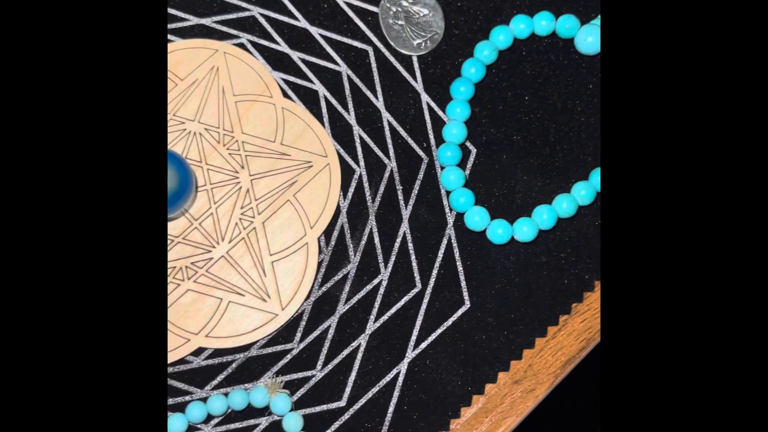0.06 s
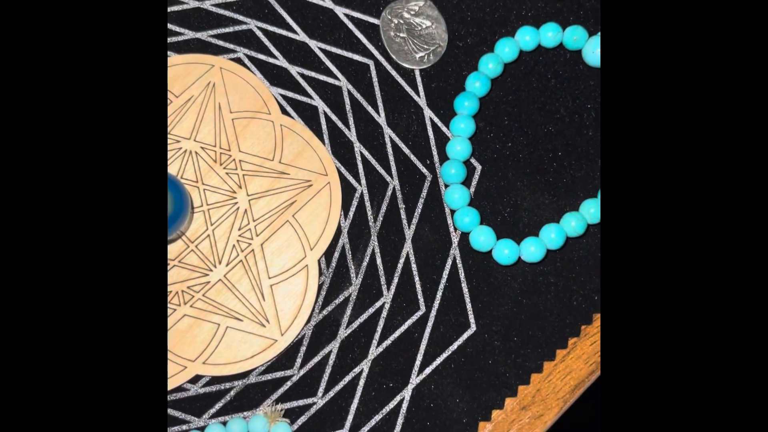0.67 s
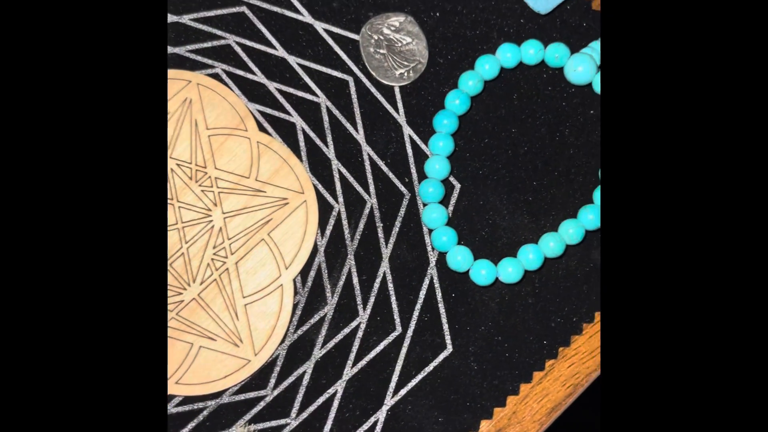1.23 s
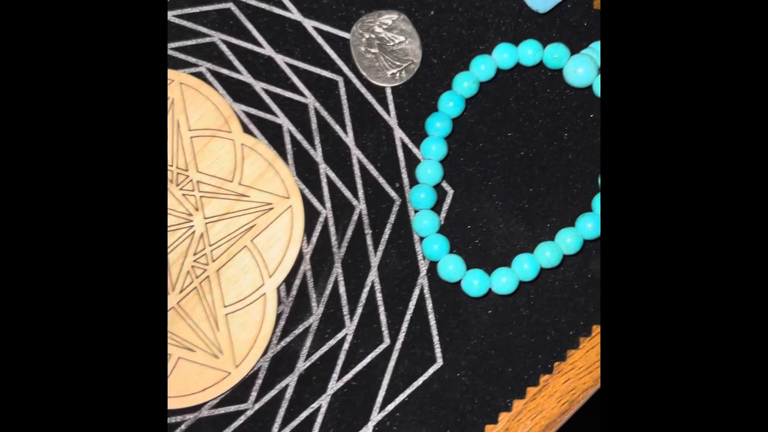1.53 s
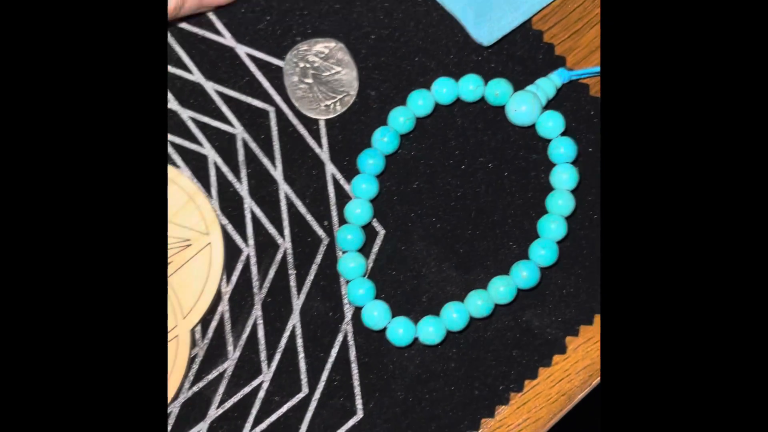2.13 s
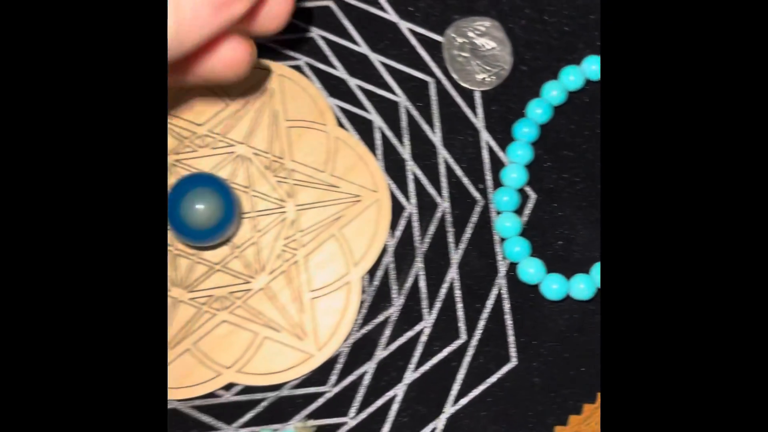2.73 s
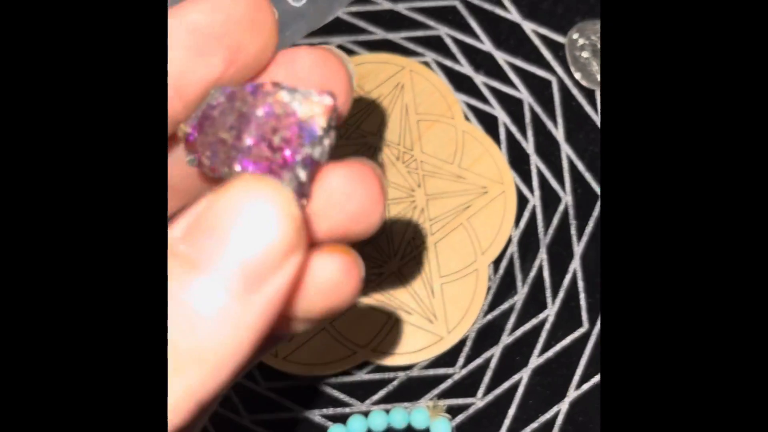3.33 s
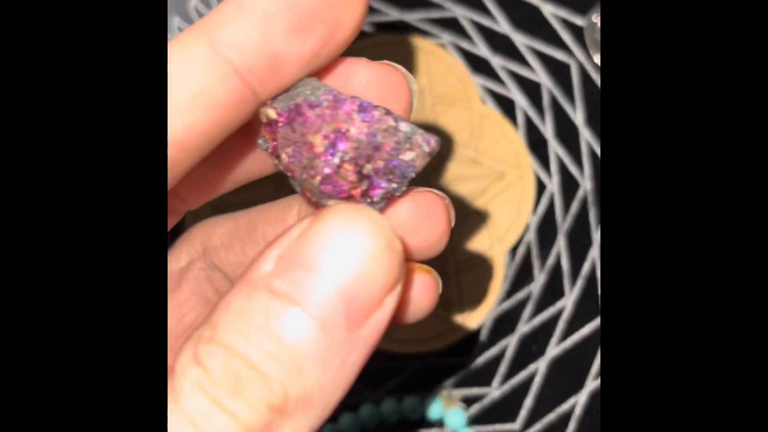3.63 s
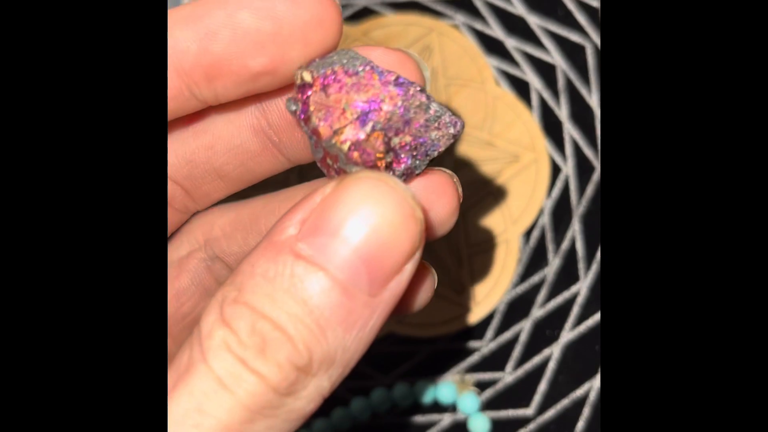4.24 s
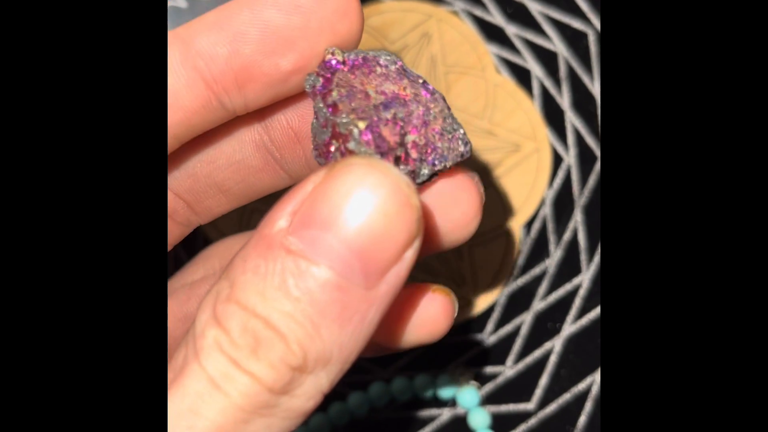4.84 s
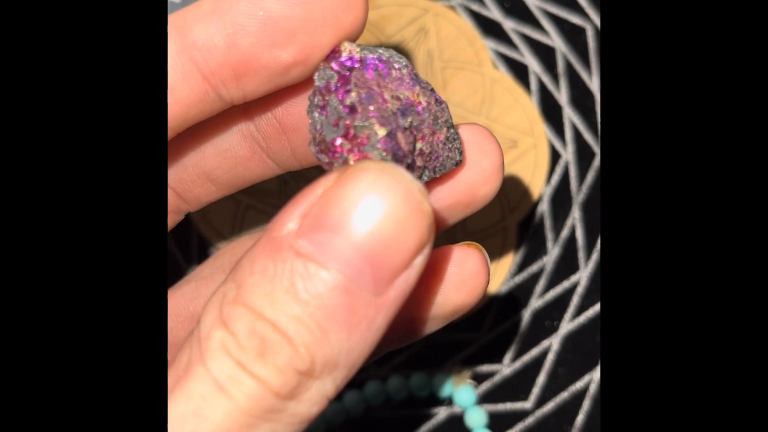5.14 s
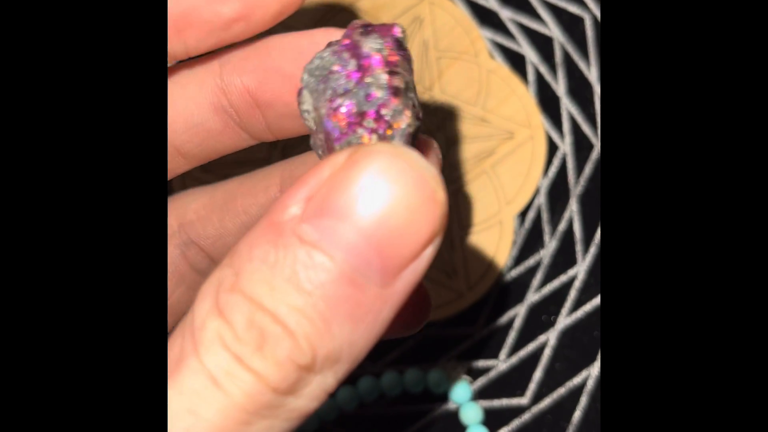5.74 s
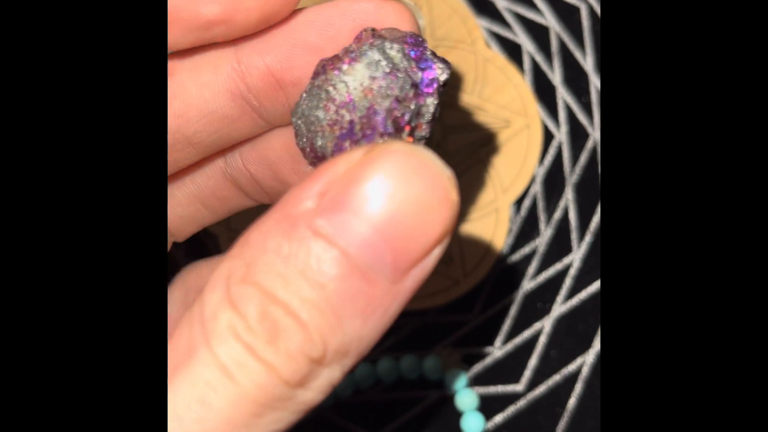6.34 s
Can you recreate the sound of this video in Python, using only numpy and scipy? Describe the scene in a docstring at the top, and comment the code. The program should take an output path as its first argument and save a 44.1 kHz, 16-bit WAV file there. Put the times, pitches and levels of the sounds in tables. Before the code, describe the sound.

Steady low fan hum indoors, with faint finger slides and a single close, clicking knock on the camera's case early on.

```python
"""A fan hums steadily in a small room: motor tones over rushing air and booming room modes.
Early on, fingers slide over a hand-held camera and friction makes its case ring thinly;
the grip shifts with a few small ticks and one dull, rattling knock that excites the body's modes.
Then only the hum is left, a little hollower once a hand is held up close."""
import sys
import numpy as np
from scipy import signal
from scipy.fft import rfft, irfft
from scipy.io import wavfile
from scipy.ndimage import uniform_filter1d

SR = 44100
rng = np.random.default_rng(int(sys.argv[2]) if len(sys.argv) > 2 else 0)


def wav_record(signal):
    """Record a signal, one row per channel, as 16-bit PCM in the file named by sys.argv[1]."""
    frames = np.transpose(np.atleast_2d(signal))
    bounded = np.clip(frames, -1, 1)
    # unit amplitude maps onto the largest positive 16-bit level
    quanta = np.round(bounded * 32767).astype(np.int16)
    wavfile.write(sys.argv[1], SR, quanta)


N = 290619
TIME, HZ = np.arange(N) / SR, np.fft.rfftfreq(N, 1 / SR)

# ringing modes of the camera's case: pitch_hz, width_hz, level_db
CASE_MODES = [(3190, 40, -8.5), (4980, 80, -9.5), (6030, 45, -1.5), (7746, 99, -1.5), (9730, 69, -4.5),
              (10740, 66, -3.5), (10960, 66, -6.5)]
# friction spectrum of skin on the case: frequency_hz, density_db
SKIN_SPECTRUM = [(800, -25.5), (2500, 5), (4200, -2.5), (5800, 1.5), (6600, -7.5), (7600, 4), (9000, -3.5),
                 (10600, 3.5), (11700, -12), (13000, -29)]


def amp(db):
    """Amplitude grows tenfold for every 20 decibels."""
    return 10 ** (np.asarray(db) / 20)


def unit(x):
    """Normalisation to an rms of 1."""
    return x / np.sqrt(np.mean(x ** 2) + 1e-30)


def curve(points):
    """Interpolation of (frequency_hz, value) points over HZ, on a logarithmic axis."""
    hz, value = np.transpose(points)
    return np.interp(np.log(HZ + 1), np.log(hz + 1), value)


def add(mix, start_s, sound):
    """Superposition: a sound adds to the mix from start_s on."""
    part = mix[..., round(start_s * SR):][..., :sound.shape[-1]]
    part += sound[..., :part.shape[-1]]


def drift(cutoff_hz):
    """Low-passed noise gives a random wander of rms 1."""
    return unit(irfft(rfft(rng.standard_normal(N)) / (1 + (HZ / cutoff_hz) ** 4), N))


def noise_pair(density):
    """Partially coherent noise at two microphone ports; density is amplitude per root hertz."""
    # likeness of the sound at the two ports: frequency_hz, coherence
    port_coherence = [(100, 1), (380, 0.97), (520, 0.48), (680, 0.2), (1400, 0.33), (1850, 0.96),
                      (2600, 0.2), (4500, 0.3), (5900, 0.98), (7400, 0.9), (9000, 1), (11000, 0.9)]
    a, b = rfft(rng.standard_normal((2, N)))
    coherence = np.clip(curve(port_coherence), 0, .9995)
    mid, side = a * np.sqrt((1 + coherence) / 2), b * np.sqrt((1 - coherence) / 2)
    return irfft(np.array([mid + side, mid - side]) * density, N) * np.sqrt(SR / 2)


def resonance_power(modes):
    """Resonances (pitch_hz, width_hz, level_db) add in power, each a peak with steep skirts."""
    return sum(amp(db) ** 2 / (1 + ((HZ - hz) / (0.68 * width)) ** 2) ** 2 for hz, width, db in modes)


def resonant_noise(modes):
    """Resonances under random excitation pass narrow or broad bands of noise."""
    return noise_pair(np.sqrt(resonance_power(modes)))


def fan_hum(shaft_hz=30.92, pull_hz=120, waver_hz=.15, flutter=0.065):
    """Periodic forcing: harmonics of the shaft and of the magnetic pull at twice the mains frequency."""
    # harmonics of the shaft's rotation: {multiple: level_db}
    shaft_orders = {3: -50, 5: -57.5, 10: -64.5, 11: -71.5, 13: -54.5, 14: -75.5, 15: -74.5}
    # harmonics of the magnetic pull: {multiple: level_db}
    pull_orders = {1: -54, 3: -72, 5: -77}
    # further steady tones of the fan's motor: pitch_hz, level_db
    motor_tones = [(222, -71), (378, -66), (391, -71.5), (553, -78.5), (611, -77.5)]
    tones = [(k * shaft_hz, db) for k, db in shaft_orders.items()]
    tones += [(k * pull_hz, db) for k, db in pull_orders.items()]
    # the pull gives the motor's whine upper sidebands, each weaker than the last
    whine_hz, sideband_db, step_db = 13 * shaft_hz, -66, -6.5
    tones += [(whine_hz + (k + 1) * pull_hz, sideband_db + k * step_db) for k in range(4)]
    hum = np.zeros(N)
    for hz, db in tones + motor_tones:
        cycles = np.cumsum(hz + waver_hz * drift(2.13)) / SR + rng.random()
        hum += amp(db) * np.sqrt(2) * np.sin(2 * np.pi * cycles) * (1 + flutter * drift(1.6))
    return hum


def fan_air(ripple_db=0.7):
    """Moving air makes broadband noise, and the fan keeps the room's modes booming."""
    # rush of the air: frequency_hz, density_db
    air_spectrum = [(15, -99), (34, -79), (55, -66.5), (130, -76.5), (250, -77), (390, -77.5), (520, -85),
                    (680, -90.5), (1150, -95.5), (1600, -103), (2700, -103), (4000, -111), (5600, -123),
                    (10500, -122.5), (12500, -133)]
    # resonances of the room: pitch_hz, width_hz, peak_density_db
    room_modes = [(72.5, 12, -64), (87.3, 12.5, -54), (163, 12, -69), (193.4, 17.5, -61), (503, 35, -79.5),
                  (632, 61, -87.5), (858, 74, -88.5), (2410, 230, -108)]
    # standing waves ripple the spectrum above the bass
    ripple = unit(uniform_filter1d(uniform_filter1d(rng.standard_normal(len(HZ)), size=130), size=130))
    ripple *= np.clip(HZ / 700 - .5, 0, 1)
    power = amp(curve(air_spectrum)) ** 2 + resonance_power(room_modes)
    return noise_pair(np.sqrt(power) * amp(ripple_db * ripple))


def finger_slides(level_db=1, grain_db=0.4, swell_db=21.5, smooth_release_s=0.093,
                  sticky_release_s=0.028):
    """Sliding friction: smooth skin hisses, while sticky skin rings the case and lets go sooner."""
    # strokes of a finger: full_pressure_s, hold_s, level_db, rise_s, stickiness (0-1)
    strokes = [(0.326, .13, -64.5, 0.0064, 0.74), (0.551, 0.13, -62, 0.086, 0.92),
               (0.83, .04, -72.5, 0.097, 0.3), (0.96, 0.13, -70, 0.12, 0.06),
               (1.358, 0.0058, -50, 0.036, 0.6), (1.415, .022, -70.5, .04, 0), (1.525, .075, -80, .1, .65),
               (2.197, 0.036, -71.5, 0.011, 0.3), (2.378, .008, -77, 0.11, .3)]
    ring_power, hiss_power = np.zeros((2, N))
    for full_s, hold_s, db, rise_s, sticky in strokes:
        release_s = smooth_release_s + sticky * (sticky_release_s - smooth_release_s)
        before = np.maximum(full_s - TIME, 0) / rise_s
        after = np.maximum(TIME - full_s - hold_s, 0) / release_s
        power = amp(db - swell_db * np.minimum(before + after, 10)) ** 2
        ring_power += sticky * power
        hiss_power += (1 - sticky) * power
    # which mode rings most shifts with the grip
    ring = unit(sum(resonant_noise([mode]) * amp(2 * drift(5.5)) for mode in CASE_MODES))
    hiss = unit(noise_pair(amp(curve(SKIN_SPECTRUM))))
    grainy_gain = amp(level_db + grain_db * drift(90))
    return grainy_gain * (np.sqrt(ring_power) * ring + np.sqrt(hiss_power) * hiss)


def finger_squeaks(jitter_hz=65):
    """Stick-slip motion locks onto one mode of the case and gives a short, rough tone."""
    # squeaks of a sticking finger: start_s, level_db, length_s, pitch_hz
    squeaks = [(0.316, -72, 0.14, 3130), (0.359, -62.5, 0.13, 6030), (0.506, -70, 0.19, 6040),
               (1.002, -69, 0.06, 3150), (1.315, -68, 0.032, 3160), (1.344, -47, 0.029, 3170),
               (1.417, -62, 0.014, 6100), (1.423, -52, 0.0076, 3000), (1.424, -70, 0.046, 3150)]
    out = np.zeros(N)
    for start_s, db, length_s, hz in squeaks:
        count = int(length_s * SR)
        cycles = np.cumsum(hz + jitter_hz * drift(560)[:count]) / SR
        envelope = amp(db) * signal.windows.tukey(count, .7)
        add(out, start_s, envelope * np.sqrt(2) * np.sin(2 * np.pi * cycles))
    return out


def case_ticks(burst_decay_s=0.0049, crack_db=-4, ring_db=-5, ring_decay_s=0.0039):
    """Impulse response: each tick is a brief crack with the free, damped ringing of the case."""
    # sharp ticks of the case: start_s, level_db
    ticks = [(0.323, -57.5), (1.007, -55.5), (1.376, -47), (1.387, -41), (1.4168, -44.5), (2.3186, -68)]
    out, t = np.zeros((2, N)), TIME[:SR // 8]
    hiss = unit(noise_pair(amp(curve(SKIN_SPECTRUM))))
    crack = amp(crack_db) * unit(resonant_noise([(2360, 2300, 0)]))
    for start_s, db in ticks:
        burst = (hiss + crack)[:, round(start_s * SR):][:, :len(t)] * np.exp(-t / burst_decay_s)
        modes = sum(amp(mode_db) * np.sin(2 * np.pi * (hz * t + rng.random()))
                    for hz, _, mode_db in CASE_MODES)
        ring = amp(ring_db) * unit(modes) * np.exp(-t / ring_decay_s)
        add(out, start_s, amp(db) * (burst + ring))
    return out


def impacts(blow_decay_cycles=0.96, rattle_decay_s=0.0057, onset_cycles=0.17):
    """Damped oscillation: blows die within about a cycle, and loose parts ring briefly."""
    # blows on the camera: start_s, level_db, pitch_hz
    blows = [(1.3515, -19.5, 282), (1.3756, -11.5, 690), (1.3762, -10.5, 280), (1.3844, -14, 1040),
             (1.3864, -8.5, 425), (1.3882, -12, 127)]
    # rattles of loose parts: start_s, level_db, pitch_hz
    rattles = [(1.3915, -29, 1005), (1.4167, -39.5, 1175), (1.4327, -28.5, 314), (2.318, -49, 1250)]
    contacts = [(start_s, db, hz, blow_decay_cycles / hz) for start_s, db, hz in blows]
    contacts += [(*rattle, rattle_decay_s) for rattle in rattles]
    out, t = np.zeros(N), TIME[:SR // 2]
    for start_s, db, hz, decay_s in contacts:
        onset = 1 - np.exp(-hz * t / onset_cycles)  # lower pitches start more softly
        add(out, start_s, amp(db) * onset * np.sin(2 * np.pi * hz * t) * np.exp(-t / decay_s))
    return out


def grip_crunch(drive, level_db=-20, smoothing_s=0.0054):
    """Amplitude modulation: the harder the blow, the more the grip crunches just after it."""
    pole = np.exp(-1 / (smoothing_s * SR))
    envelope = np.sqrt(signal.lfilter([1 - pole], [1, -pole], drive ** 2 + 1e-20))
    return amp(level_db) * envelope * unit(resonant_noise([(1060, 900, -1.5), (2150, 350, -3.5)]))


def wall_reflections(drive, level_db=-18, t60_s=0.29, cutoff_hz=2500, delay_s=.006):
    """Reverberation: the walls answer a few milliseconds later with a dull, short tail."""
    t = TIME[:SR // 2]
    dull_noise = noise_pair(1 / (1 + (HZ / cutoff_hz) ** 2))[:, :len(t)]
    tail = dull_noise * amp(-60 * t / t60_s) * (t > delay_s)
    tail /= np.sqrt(np.sum(tail ** 2) / 2 * SR / (2 * cutoff_hz))  # about unit gain in the passband
    return amp(level_db) * signal.fftconvolve(drive[None], tail, axes=1)[:, :N]


def knock(body_db=-50, low_cut_hz=75):
    """Modal response: a quick run of impacts rings the camera's body and, faintly, the room."""
    # modes of the camera and hand together: pitch_hz, level_db, t60_s
    body_modes = [(109.6, -0.5, 0.15), (183, 2, 0.093), (313.4, -2.5, 0.22), (407.5, -3.5, 0.14),
                  (527, -7.5, 0.16), (667, -5, 0.21), (755, -19, .1), (890, 0, 0.12), (1067, 3, 0.079),
                  (1290, 7.5, 0.05), (1390, 5, 0.044), (2020, -2, 0.054), (2130, -11, 0.097)]
    drive, t = impacts(), TIME[:SR // 2]
    response = sum(amp(db - 60 * t / t60_s) * np.cos(2 * np.pi * hz * t) for hz, db, t60_s in body_modes)
    body = amp(body_db) * signal.fftconvolve(drive, response)[:N]
    # the middle register is louder at the left port
    pan_db = curve([(150, .2), (350, 1.0), (650, 3.4), (1200, 1.0), (2000, 0.2)])
    direct = irfft(rfft(drive + body) * amp([pan_db, -pan_db]), N)
    sound = direct + grip_crunch(drive) + wall_reflections(drive)
    return signal.sosfilt(signal.butter(2, low_cut_hz, "high", fs=SR, output="sos"), sound)


def hand_hollow(level_db=-85, midway_s=2.8, fade_s=.4):
    """Resonance: a hand held close in front of the camera adds a hollow note to the rush of air."""
    nearness = np.clip((TIME - midway_s) / fade_s + .5, 0, 1)
    return nearness * resonant_noise([(855, 42, level_db), (943, 45, level_db - 7.0)])


def scene():
    """Superposition of the fan, slightly to the left, and the handling of the camera."""
    fan = (fan_air() + hand_hollow() + fan_hum()) * amp([[.2], [-.2]])
    return fan + finger_slides() + finger_squeaks() + case_ticks() + knock()


def record(dry, cutoff_hz=12400):
    """A phase difference separates the two ports; a low-pass filter limits the bandwidth."""
    # phase lead of the left port: frequency_hz, lead_rad
    port_lead = [(0, 0), (520, 0), (860, .7), (1650, 0), (3100, .6), (4000, .8), (4850, 3.1), (5650, 6.2),
                 (6250, 6.4), (8500, 9.3), (9500, 9.6), (11800, 12.4)]
    lead_rad = np.interp(HZ, *np.transpose(port_lead))
    ports = irfft(rfft(dry) * np.exp(.5j * np.array([lead_rad, -lead_rad])), N)
    low_pass = signal.firwin(255, cutoff_hz, window=("kaiser", 8), fs=SR)
    return signal.oaconvolve(ports, low_pass[None], "same")


dry = scene()
out = record(dry)
wav_record(out)
```